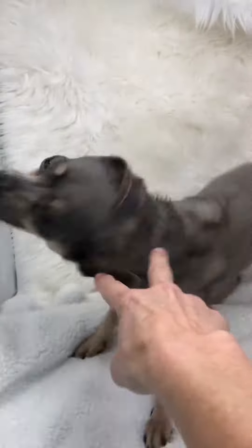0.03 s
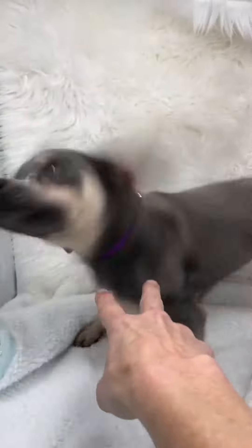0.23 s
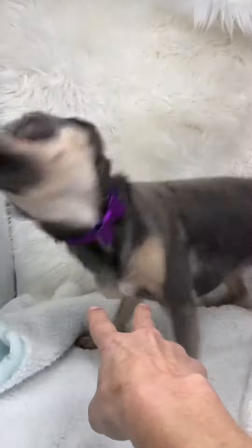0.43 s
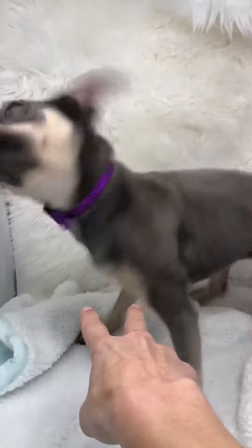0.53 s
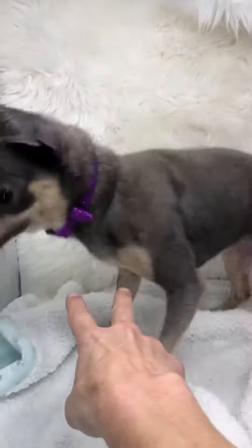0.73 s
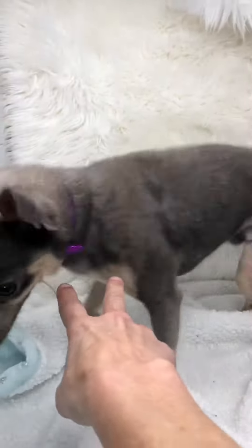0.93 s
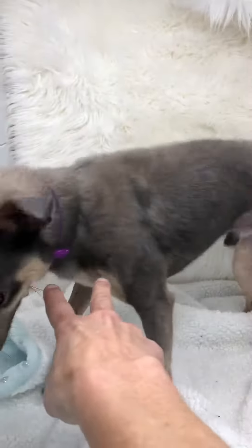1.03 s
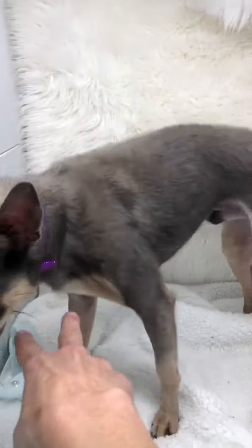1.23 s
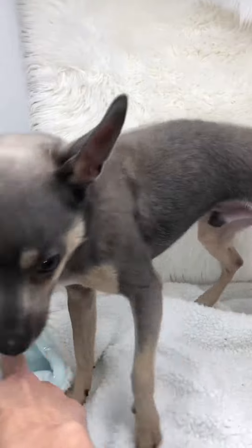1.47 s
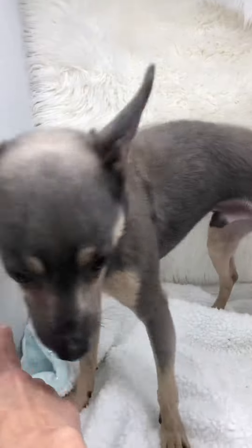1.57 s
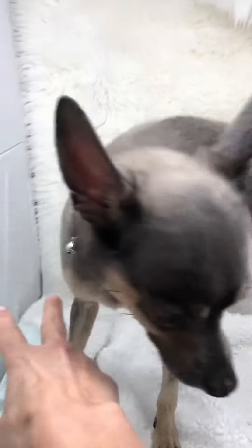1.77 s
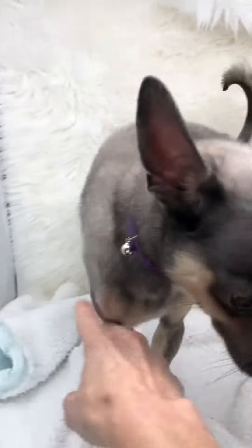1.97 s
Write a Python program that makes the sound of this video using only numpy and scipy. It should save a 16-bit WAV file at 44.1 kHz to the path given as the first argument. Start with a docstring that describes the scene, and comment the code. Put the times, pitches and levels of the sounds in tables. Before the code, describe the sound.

Close up indoors, a small dog's collar bell rattles in quick, high, short tinkles among leathery ear flaps and low body thumps for over half a second, then lighter jingling fades into near-silence with a low fan hum.

```python
"""Small dog shaking its head

Indoors on a blanket, close to a phone's microphone, two seconds. The pellet of a tiny collar bell strikes and
rolls: impulses ring the modes of the shell, damped by fur. Ears slap (shaped noise bursts with leathery
resonances) and head and body thump softly (damped sines). Fur and blanket rustle, the shaking body rumbles
(shaped noise), a fan hums (wavering sine) in the room air, and near walls return a short echo.
"""
import sys
import numpy as np
from scipy import signal
from scipy.fft import rfft, irfft
from scipy.io import wavfile
from scipy.ndimage import uniform_filter1d

SR = 44100
rng = np.random.default_rng(int(sys.argv[2]) if len(sys.argv) > 2 else 0)


def materialize(psi):
    """Save the field psi as 16-bit PCM at rate SR to the path in sys.argv[1].

    A 1-D psi becomes a single channel; in a 2-D psi each row is a channel.
    """
    bounded = np.clip(np.atleast_2d(psi).T, -1, 1)
    quanta = np.round(bounded * 32767).astype(np.int16)
    wavfile.write(sys.argv[1], SR, quanta)


def field_ratio(decibels):
    """Amplitude ratio for a level in dB (20 dB per decade); scalars and array-likes work."""
    return 10 ** (np.asarray(decibels, dtype=float) / 20)


N = 88200

# Modes of the bell shell, ringing free: pitch_hz, level_db, t60_s
BELL_MODES = [(6600, -17, .015), (6900, -16, .019), (7200, -11, .025), (7450, -12, .03), (7640, -10, .035),
              (7830, -1.5, .045), (7880, -4, .08), (8150, -10, .03), (9400, -25.5, .02), (8520, -18, .075)]
# Pellet strikes: start_s, level_db (relative), spot_hz (where the struck spot rings best),
# ring_share (of the ring time), rebounds_s (time in which the rebounds die down)
STRIKES = [(0.0148, -16.5, 7400, 0.58, 0.0063), (0.037, -17.5, 7710, 0.5, 0.012),
           (0.0667, -24, 7140, 0.62, 0.0055), (0.0852, 1.5, 7720, 0.7, 0.002),
           (0.0979, -8, 8090, 0.84, 0.0028), (0.1074, -28, 8200, 0.78, 0.006),
           (0.1164, -22.5, 7300, 0.68, 0.0053), (0.1769, -16, 7630, 1, 0.0057),
           (0.1984, -18, 7640, 0.47, 0.006), (0.2114, -22, 7200, 0.5, 0.0077),
           (0.2488, -23, 7140, 0.67, 0.0054), (0.2644, -25.5, 8400, 0.38, 0.0056),
           (0.3131, -15, 8360, 0.57, 0.0051), (0.3254, -9.5, 7370, 0.97, 0.0073),
           (0.329, -6, 7950, 0.24, 0.0036), (0.396, -10.5, 8250, 0.66, 0.0049),
           (0.41, -7.5, 7580, 0.21, 0.011), (0.4134, -11, 7950, 1, 0.0086),
           (0.4314, -16, 7340, 0.42, 0.0031), (0.4623, -23.5, 8260, 0.8, 0.016),
           (0.4773, -6.5, 7560, 0.38, 0.0073), (0.4968, -13, 8040, 1, 0.013),
           (0.5337, -12.5, 7200, 0.48, 0.0038), (0.5521, -2.5, 7650, 0.52, 0.003),
           (0.5969, -30, 7560, 0.28, 0.0048), (0.628, -17.5, 7450, 0.61, 0.0074),
           (0.6504, -21, 7430, 0.98, 0.005), (0.6729, -20.5, 7270, 0.73, 0.0073),
           (0.6863, -12.5, 7860, 0.82, 0.0026), (0.7178, -28, 7830, 0.52, 0.0035),
           (0.7397, -27, 7740, 1, 0.012), (0.7567, -18.5, 7700, 1, 0.023),
           (0.8259, -28.5, 8000, 0.79, 0.016), (0.847, -6, 8040, 0.5, 0.0096),
           (0.8594, -25, 8400, 0.83, 0.0078), (0.8738, -19, 8240, 0.5, 0.006),
           (0.8888, -8.5, 8090, 0.59, 0.0042), (0.9054, -29, 8300, 0.57, 0.016),
           (0.9541, -26, 7900, 0.27, 0.0033), (0.974, -41, 8600, 0.97, 0.0067),
           (1.0024, -27, 8270, 0.77, 0.0061), (1.009, -27, 8430, 0.67, 0.0035),
           (1.0129, -20, 7870, 1, 0.0067), (1.0274, -25.5, 7800, 0.9, 0.0082),
           (1.0384, -23, 8000, 1, 0.0045), (1.0554, -28, 7670, 0.7, 0.0067), (1.06, -23.5, 7960, 1, 0.0046),
           (1.0958, -30, 7700, 0.8, 0.0046), (1.1069, -24.5, 7320, 1, 0.0039),
           (1.1208, -26, 7800, 1, 0.004), (1.1682, -23.5, 7680, 1, 0.0052),
           (1.2211, -36, 7950, 0.79, 0.0072), (1.2374, -46, 8170, 0.92, 0.0075),
           (1.3284, -36.5, 7700, 0.4, 0.0061), (1.464, -44.5, 7980, 0.34, 0.009),
           (1.496, -52, 8000, 0.4, 0.0036), (1.5159, -47.5, 7700, 0.35, 0.003),
           (1.535, -40, 7400, 0.4, 0.0079), (1.5748, -43.5, 7880, 0.4, 0.0035),
           (1.6221, -38, 7500, 0.5, 0.006), (1.6371, -37, 8060, 0.53, 0.0039),
           (1.6871, -50.5, 7880, 0.52, 0.0026), (1.703, -34, 7450, 0.27, 0.0058)]
# Pellet rolling and chattering in the shell: time_s, level_db (relative)
ROLL_LEVEL = [(0.0, -39), (0.23, -38), (0.47, -48), (0.55, -34), (0.7, -35), (0.81, -44.5), (0.99, -44.5),
              (1.06, -33.5), (1.26, -72.5), (1.31, -51.5), (1.35, -66), (1.39, -60.5), (1.43, -77),
              (1.47, -57.5), (1.55, -64), (1.66, -59), (1.77, -75), (2.0, -70)]
# Ear slaps and small knocks: start_s, peak_db, pitch_hz (nominal), treble_db, body_db
SLAPS = [(0.0164, -27.5, 2400, 2.5, -5.5), (0.0704, -18, 3900, 5.5, -12.5), (0.1497, -15, 2660, 5, -14),
         (0.2177, -34.5, 2650, -16, -7), (0.2275, -19.5, 2580, -2, -11.5), (0.305, -4, 4550, -1.5, -22.5),
         (0.378, -12, 3760, -7, -12.5), (0.3921, -21, 3230, 16, -8), (0.4516, -13.5, 5130, 4, -16),
         (0.37, -36, 2800, -20, -26), (0.5191, -16.5, 3100, -5.5, -14), (0.5313, -32, 2570, -12.5, -7),
         (0.588, -25.5, 3400, 4, -8), (0.5954, -43, 1910, -16, -4), (0.714, -41, 1460, -34.5, 1),
         (0.7984, -42, 1480, -36, -6.5), (0.883, -48.5, 2370, -12, -17), (1.0286, -50.5, 4350, -13, -14),
         (1.0858, -50.5, 1330, -14, 1), (1.135, -56, 2500, -21, -14), (1.9946, -44, 1890, -38, -13.5)]
# Leathery resonances of an ear: share of the slap's pitch (ratio), level_db
EAR_RINGS = [(.42, -6), (.58, 2), (.74, -3), (1.0, 4), (1.2, -12.5)]
# Soft thumps of head and body: start_s, peak_db, pitch_hz, t60_s
THUMPS = [(.105, -34.5, 360, 0.057), (0.15, -31, 103, 0.059), (0.299, -26.5, 138, 0.047),
          (.378, -31.5, 285, 0.063), (0.39, -28.5, 89, 0.043), (0.454, -28, 64, 0.11),
          (0.571, -22.5, 117.2, 0.097), (.714, -45, 530, 0.025), (0.799, -38.5, 513, 0.014),
          (1.9958, -40.5, 760, .03)]
# Rustle of fur and blanket as the dog moves: time_s, level_db (relative)
RUSTLE_LEVEL = [(0, -57.5), (.2, -56.5), (.38, -55.5), (.45, -56), (.57, -56), (.66, -65), (.94, -71.5),
                (1.15, -74), (1.27, -78.5), (1.36, -75.5), (1.47, -73), (1.58, -91.5), (1.7, -78),
                (1.8, -72.5), (1.92, -84.5), (2, -79.5)]
# Spectrum of the rustle: frequency_hz, density_db (relative, per Hz)
RUSTLE_COLOUR = [(300, -4), (800, 4), (2000, -4), (5000, -6), (10000, -8), (16000, -14)]
# Low rumble of the shaking body through the blanket: time_s, level_db (relative)
RUMBLE_LEVEL = [(0.0, -51), (0.02, -42), (0.48, -36), (0.548, -35.5), (0.584, -39.5), (0.628, -42),
                (0.954, -47.5), (0.992, -63), (1.2, -47.5)]
# Spectrum of the rumble: frequency_hz, density_db (relative, per Hz)
RUMBLE_COLOUR = [(25, -15), (55, -1.5), (200, -1), (330, -7.5), (600, -21.5)]
# Spectrum of the room air: frequency_hz, density_db (relative, per Hz)
ROOM_AIR_COLOUR = [(15, -39), (30, -24.5), (65, -5), (120, -8), (165, -17.5), (290, -16), (430, -23),
                   (700, -31.5), (1000, -42), (2000, -45.5), (4000, -52.5), (9000, -56.5), (15200, -70.5),
                   (16500, -69)]

HANGS_FREE_S = (0.82, 1.3)  # outside this span the bell swings or lies in the fur and wavers more
FUR_T60_S = 0.051  # longest ring that the fur allows


def pellet_strikes():
    """Each strike and its quick rebounds ring most the modes nearest the struck spot."""
    spot_width_hz, spot_db, rise_s = 210, 9.5, 0.0014
    rebound_count, rebound_spread_db = 16, 3
    out, length = np.zeros(N), SR // 8
    hz, mode_db, t60 = np.array(BELL_MODES).T
    for start_s, level_db, spot_hz, ring_share, rebounds_s in STRIKES:
        if HANGS_FREE_S[0] < start_s < HANGS_FREE_S[1]:
            detune, scatter_db, longest_s, rebounds_per_s, rebound_db = 0.0034, 4.5, 1, 500, -5.5
        else:
            detune, scatter_db, longest_s, rebounds_per_s, rebound_db = 0.022, 5.5, FUR_T60_S, 730, -0.5

        # The strike itself, then rebounds at chance intervals
        hit_s = np.r_[0, np.cumsum(rng.exponential(size=rebound_count))] / rebounds_per_s
        hit_db = np.r_[0, rebound_db + rebound_spread_db * rng.standard_normal(rebound_count)]
        hit_size = field_ratio(hit_db) * np.exp(-(hit_s / rebounds_s) ** 2)
        hit_index = np.minimum((hit_s * SR).astype(int), length - 1)

        near_spot_db = spot_db * np.exp(-((hz - spot_hz) / spot_width_hz) ** 2)
        scatter = scatter_db * rng.standard_normal((len(hit_s), len(hz)))
        mode_gain = field_ratio(mode_db + near_spot_db + scatter)
        mode_taps = np.zeros((length, len(hz)))
        np.add.at(mode_taps, hit_index, hit_size[:, None] * mode_gain)
        plain_taps = np.zeros(length)
        np.add.at(plain_taps, hit_index, hit_size)

        ring = np.zeros(length)
        mode_hz = hz * (1 + detune * rng.standard_normal(len(hz)))
        for k in range(len(hz)):
            ringing = mode(mode_taps[:, k], mode_hz[k], min(t60[k], longest_s) * ring_share)
            ring += band(ringing, hz[k], 1 / rise_s)  # a narrow band slows the onset
        ring = shell(ring)
        ring = ring / np.sqrt(2 * uniform_filter1d(ring ** 2, SR // 400).max())
        tick_db = -22 + 0.6 * level_db  # harder strikes tick more
        add(out, start_s, field_ratio(level_db - 5.5) * (ring + field_ratio(tick_db) * tick(plain_taps)))
    return out


def pellet_rolling():
    """Dense light taps of the rolling pellet, each mode struck with its own strength."""
    taps_per_s, spread_db = 330, 7
    ring_share = 0.6  # the rolling pellet damps the shell
    size = field_ratio(spread_db * np.minimum(rng.exponential(size=N), 3))
    taps = size * (rng.random(N) < taps_per_s / SR)
    ring = np.zeros(N)
    for hz, mode_db, t60 in BELL_MODES:
        struck = taps * rng.standard_normal(N)
        ring += field_ratio(0.65 * mode_db) * mode(struck, hz, min(t60, FUR_T60_S) * ring_share)
    chatter = unit(shell(ring)) + field_ratio(-19.5) * unit(tick(taps))
    return chatter * field_ratio(curve(ROLL_LEVEL) - 5.5)


def mode(x, hz, t60):
    """One ringing mode: a two-pole resonator whose ring falls 60 dB in t60 seconds."""
    radius, angle = 1000. ** (-1 / (t60 * SR)), 2 * np.pi * hz / SR
    return signal.lfilter([np.sin(angle)], [1, -2 * radius * np.cos(angle), radius ** 2], x)


def shell(x):
    """The small shell radiates only a band of the treble."""
    return band_twice(x, 7900, 3000)


def tick(taps):
    """Dry contact of metal on metal: each tap is a short burst of treble noise."""
    t = np.arange(SR // 50) / SR
    envelope = signal.fftconvolve(taps, fade(t, 0.016, 2 / SR))[:len(taps)]
    return band_twice(envelope * rng.standard_normal(len(taps)), 11210, 9700)


def ear_slaps():
    """An ear against the head: a crack with leathery rings, a grainy tail, a dull body."""
    crack_t60_s, tail_t60_s, tail_rise_s = 0.012, 0.048, 0.0041
    tail_db, grain_db, grains_per_s = -17, 8.5, 900
    out, t = np.zeros(N), np.arange(SR // 10) / SR
    tail = fade(t, tail_t60_s, tail_rise_s)
    for start_s, peak_db, hz, treble_db, body_db in SLAPS:
        skin_noise, treble_noise, body_noise = rng.standard_normal((3, len(t)))
        grain = rng.standard_normal(len(t))[(t * grains_per_s).astype(int)]  # stepped chance level
        rise_s = min(0.00015 * field_ratio(1.1 * peak_db), 0.001)  # harder slaps rise more slowly
        envelope = fade(t, crack_t60_s, rise_s) + field_ratio(tail_db + grain_db * np.minimum(grain, 1)) * tail

        rings = np.zeros(len(t))
        for share, ring_db in EAR_RINGS:
            ring_hz = hz * share * np.exp(0.02 * rng.standard_normal())
            rings += field_ratio(ring_db) * unit(band(skin_noise, ring_hz, hz * 0.09))
        crack = unit(band_twice(skin_noise, hz * 0.7, hz * 0.91))
        crack = crack + field_ratio(3) * unit(band(rings, hz, hz))
        crack = crack + field_ratio(treble_db) * unit(band_twice(treble_noise, 11210, 11210))
        crack = crack * envelope
        body = unit(band(body_noise, 277.8, 277.8)) * tail
        add(out, start_s, field_ratio(peak_db) * (crack / np.abs(crack).max() + field_ratio(body_db) * body))
    return out


def soft_thumps():
    """Head and body give low damped swings, which take most of a cycle to build."""
    out, t = np.zeros(N), np.arange(SR // 4) / SR
    for start_s, peak_db, hz, t60 in THUMPS:
        swing = np.sin(2 * np.pi * hz * t) * fade(t, t60, 0.77 / hz)
        add(out, start_s, field_ratio(peak_db) * swing / np.abs(swing).max())
    return out


def fur_rustle():
    """Rubbing fur and blanket: broad noise that follows the movement and flickers a little."""
    return coloured(RUSTLE_COLOUR) * field_ratio(curve(RUSTLE_LEVEL) + 6 + 1.5 * walk(57))


def body_rumble():
    """The shaking body felt through the blanket: low noise, silent after its last table entry."""
    return coloured(RUMBLE_COLOUR) * field_ratio(curve(RUMBLE_LEVEL, right=-99) - 4)


def fan_hum():
    """The fan's low tone, its pitch and level wavering by chance."""
    hz = 119.6 + 4 * walk(12.6)
    return np.sin(2 * np.pi * np.cumsum(hz) / SR) * field_ratio(-46 + 3.5 * walk(10))


def room_air():
    """Steady air of the room: noise, strongest in the bass."""
    return coloured(ROOM_AIR_COLOUR) * field_ratio(-48)


def wall_echo(near):
    """Short echo off near walls: the sound smeared by fading noise of unit energy."""
    t = np.arange(SR // 4) / SR
    echo = rng.standard_normal(len(t)) * fade(t, 0.12, 0.0052)
    return field_ratio(-23) * signal.fftconvolve(near, echo / np.sqrt(np.sum(echo ** 2)))[:N]


def curve(table, right=None):
    """A (time_s, value) table read at every sample."""
    return np.interp(np.arange(N) / SR, *np.array(table).T, right=right)


def unit(x):
    """Scaled to rms 1."""
    return x / np.sqrt(np.mean(x ** 2))


def coloured(points):
    """Noise of rms 1 with a spectrum drawn through (frequency_hz, density_db) points."""
    hz, db = np.array(points).T
    f = np.arange(N // 2 + 1) * SR / N + 1
    gain = field_ratio(np.interp(np.log(f), np.log(hz), db, -99, -99))
    return unit(irfft(rfft(rng.standard_normal(N)) * gain, N))


def walk(rate_hz):
    """Slow chance of rms 1: noise smoothed twice over 1 / rate_hz."""
    width = int(SR / rate_hz)
    return unit(uniform_filter1d(uniform_filter1d(rng.standard_normal(N), width), width))


def band(x, hz, width_hz):
    """Resonant band-pass."""
    return signal.lfilter(*signal.iirpeak(hz, hz / width_hz, fs=SR), x)


def band_twice(x, hz, width_hz):
    """The band-pass applied twice, for steeper sides."""
    return band(band(x, hz, width_hz), hz, width_hz)


def fade(t, t60, rise_s):
    """Quick rise, exponential fall."""
    return (1 - np.exp(-t / rise_s)) * 1000. ** (-t / t60)


def add(out, start_s, x):
    """Mixes x into out from start_s."""
    i = int(start_s * SR)
    out[i:i + len(x)] += x[:N - i]


def scene():
    """The dog up close with its echo, then rustle, rumble, fan and room air, in mono."""
    dog = pellet_strikes() + pellet_rolling() + ear_slaps() + soft_thumps()
    background = fur_rustle() + body_rumble() + fan_hum() + room_air()
    return (dog + wall_echo(dog) + background)[None]


def top_cut(x):
    """Nothing passes above the cut-off."""
    return signal.sosfilt(signal.butter(12, 16800, fs=SR, output="sos"), x)


def record(dry):
    """The phone cuts the top steeply above 16 kHz."""
    low_pass = signal.ellip(8, .2, 70, 16000, fs=SR, output="sos")
    mix = signal.sosfilt(low_pass, dry)
    return top_cut(mix)


dry = scene()
out = record(dry)
materialize(out)
```